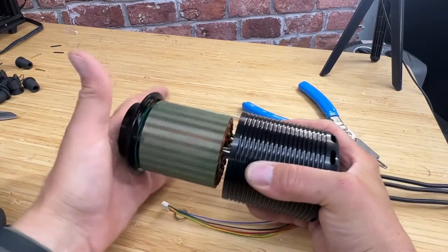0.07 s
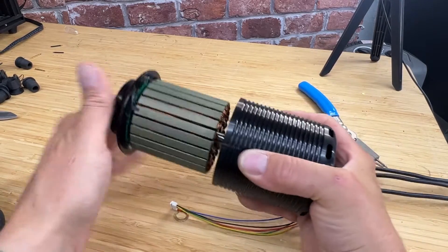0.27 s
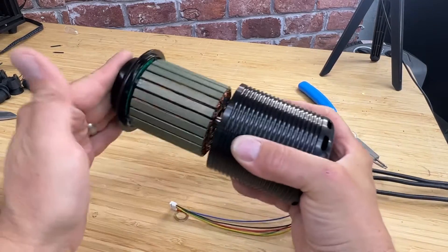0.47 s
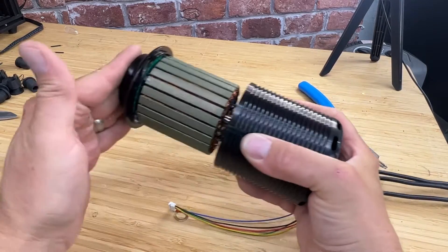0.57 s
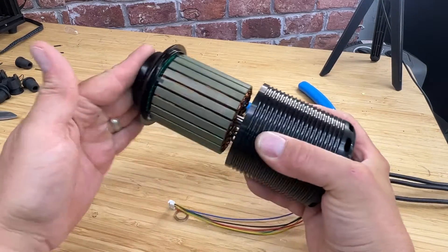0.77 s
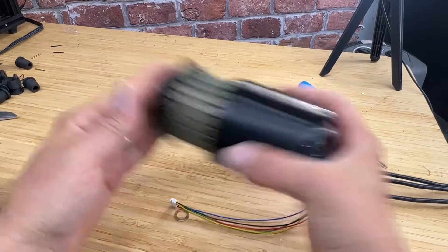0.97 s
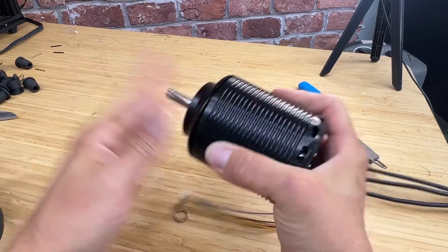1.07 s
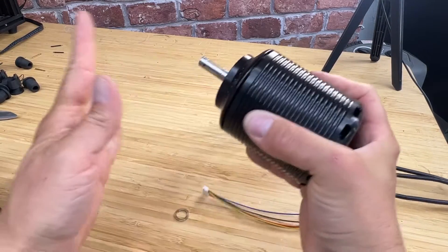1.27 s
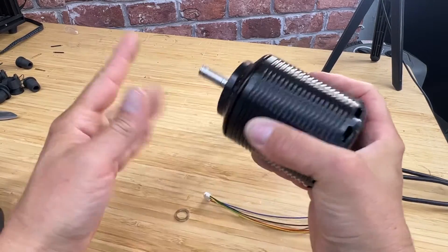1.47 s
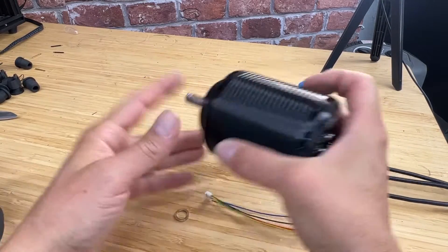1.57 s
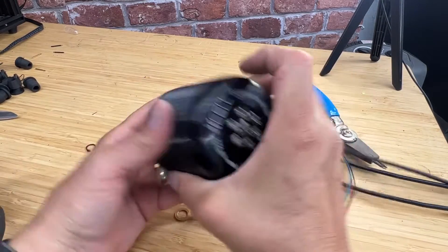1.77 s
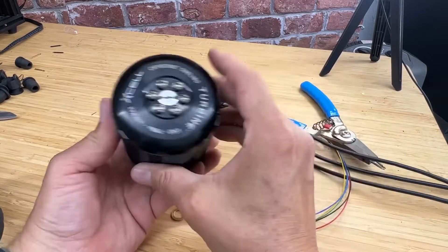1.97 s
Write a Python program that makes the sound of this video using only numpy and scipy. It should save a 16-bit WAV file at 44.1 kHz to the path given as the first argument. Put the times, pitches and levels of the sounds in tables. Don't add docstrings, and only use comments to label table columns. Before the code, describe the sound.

A motor core snaps into a metal housing with a violent, distorted clack and short high ring around one second; soft hand rustles and taps before and after, low distant hum, small room, close microphone.

```python
import sys
import numpy as np
from scipy import signal
from scipy.io import wavfile

SR = 44100
rng = np.random.default_rng(int(sys.argv[2]) if len(sys.argv) > 2 else 0)


def how_loud(loudness_db):
    steps = np.asarray(loudness_db, float) / 20
    return 10 ** steps


def bounce(signal):
    frames = np.transpose(np.atleast_2d(signal))
    limited = np.clip(frames, -1, 1)
    pcm = np.round(limited * 32767).astype(np.int16)
    wavfile.write(sys.argv[1], SR, pcm)


N = 88332

# frequency in Hz, level in dB.
AIR_SPECTRUM = [(12, -6), (40, -1.5), (110, -13.5), (170, -21.5), (400, -27.5), (1000, -51.5),
                (4000, -59.5), (16000, -76)]
AIR_DB = -43.5

# time in seconds, level in dB.
SHAFT_LEVEL = [(0.0, -31), (0.06, -34.5), (0.31, -39), (0.38, -35.5), (0.48, -39.5), (0.72, -35.5),
               (0.99, -31), (1.05, -29), (1.29, -34.5), (1.34, -34), (1.94, -38.5), (2.0, -43)]
# multiple of the shaft frequency, level in dB.
SHAFT_ORDERS = [(2, -39.5), (3, -46.5), (5, -57.5), (7, -62)]
SHAFT_HZ, SHAFT_WANDER_RAD = 29.28, 0.083
MAINS_HZ, MAINS_DB, WOBBLE_DB = 119.9, -43, 2

# time in seconds, level in dB.
HAND_LEVEL = [(0, -63), (.03, -59), (.25, -62), (.5, -65), (.66, -59), (.76, -53), (.85, -63.5), (1.3, -57),
              (1.45, -54), (1.62, -50), (1.8, -46), (1.92, -51), (2, -55.5)]
# frequency in Hz, level in dB per Hz.
RUSTLE_SPECTRUM = [(200, -2), (450, -4), (900, -7), (1700, -12), (3500, -22), (6000, -32), (10000, -44),
                   (15000, -59)]

# start in seconds, peak in dB, low edge in Hz, high edge in Hz,
# 60 dB decay time in seconds.
TAPS = [(.039, -55, 1200, 2470, .03), (0.064, -55.5, 1180, 2150, .03), (0.086, -60, 1190, 2630, .03),
        (.093, -65, 8000, 12000, .006), (0.12, -51, 2500, 9500, .006), (.148, -51, 1000, 2480, .06),
        (0.196, -51, 1010, 1680, .08), (0.404, -63, 3476, 4500, 0.009), (.599, -50, 700, 2600, .04),
        (0.689, -52, 990, 2360, 0.023), (0.704, -63, 1200, 4500, 0.0086), (0.728, -48.5, 1010, 3200, .04),
        (.7, -41.5, 330, 700, 0.62), (.765, -58.5, 1220, 3500, .03), (.906, -49, 491, 1400, 0.036),
        (1.4707, -34, 700, 3453, 0.0046), (1.472, -42, 356.6, 950, 0.062), (1.49, -47, 800, 1202, 0.44),
        (1.561, -47, 2720, 4950, .01), (1.801, -37.5, 455, 799, 0.055), (1.843, -30.5, 803, 1680, 0.032),
        (1.843, -31, 295, 600, 0.067), (1.848, -61.5, 10620, 11900, 0.0086), (1.862, -41, 500, 1894, 0.25)]

# frequency in Hz, 60 dB decay time in seconds.
ROOM_T60 = [(200, 0.9), (600, 0.5), (1300, 0.3719), (3700, 0.4221), (6000, 0.33), (9000, 0.34),
            (15000, 0.58)]
# frequency in Hz, level in dB.
ROOM_LEVEL = [(200, -56.5), (600, -47), (1300, -40), (3700, -41.5), (6000, -39), (9000, -59), (15000, -47)]
ROOM_ONSET_S = 0.0026
LATE_DB, LATE_STRETCH = -20, 1.88

SLIDE_START_S, SLIDE_END_S, SLIDE_DB, SLIDE_RISE_DB = 0.932, 1, -86, 15

BLOW_S = [
    .9815,
    1.0058,
    1.02134,
]
# housing ring in dB, core thud in dB, crack in dB.
BLOW_LEVELS = [
    (-29, -47, -24.5),
    (-0.5, 10.5, 3),
    (-3.5, 9.5, -6.5),
]
# frequency in Hz, level in dB, 60 dB decay time in seconds.
CORE_MODES = [(700, -28.5, 0.0045), (1089, -16, .01), (1266.2, -11, 0.028), (1451, -6, 0.0087),
              (1750, -18.5, 0.0086)]
HOUSING_HZ = [3705, 3760, 3722, 3600, 2487, 5490, 6250, 7440, 10100, 12770, 14870, 15065, 15250, 15600]
HOUSING_DB = [7, 4, -15, -26, -17.5, -27.5, -34.5, -34, -40.5, -37, -33.5, -23, -29, -27]
HOUSING_T60_S = [.05, .008, .11, .05, .04, .03, .015, .03, .09, .12, .1, .13, .07, .03]
LONG_RING_HZ, LONG_RING_DB, LONG_RING_T60_S = 3730, -36, 0.6
RING_LAG_S = 0.0008
TOUCH_ZING_DB = 22.5
CRACK_HZ, CRACK_T60_S = 7500, 0.029
CORE_CUT_HZ = 760

KNOCK_HZ, KNOCK_RISE_HZ_PER_S, KNOCK_DB, KNOCK_T60_S = 493, 5300, -30.5, 0.12

CLIP_TOP, CUTOFF_HZ, EDGE_S = 0.98, 16500, 0.004


def in_time(rows):
    return np.interp(np.arange(N) / SR, *np.transpose(rows))


def at_hz(points, hz):
    table = np.array(points)
    return np.interp(np.log(hz), np.log(table[:, 0]), table[:, 1])


def rms_one(x):
    return x / np.sqrt(np.mean(x ** 2) + 1e-20)


def drift(rate_hz):
    r = np.exp(-2 * np.pi * rate_hz / SR)
    slow = signal.lfilter([1], [1, -2 * r, r * r], rng.standard_normal(N + SR))
    return rms_one(slow[SR:])


def band_pass(x, low_hz, high_hz, order=2):
    return signal.sosfilt(signal.butter(order, [low_hz, high_hz], "band", fs=SR, output="sos"), x)


def bands(size):
    edges = 10 * 2 ** np.arange(0, 11, 0.5)
    white = rng.standard_normal((2, size + 8192))
    for k, (low, high) in enumerate(zip(edges, edges[1:])):
        yield np.sqrt(low * high), band_pass(white[k % 2], low, high)[8192:]


def ring(clicks, hz, t60):
    r = how_loud(-60 / (t60 * SR))
    w = 2 * np.pi * hz / SR
    return signal.lfilter([0, np.sin(w)], [1, -2 * r * np.cos(w), r * r], clicks + 1e-18)


def air():
    noise = sum(how_loud(at_hz(AIR_SPECTRUM, hz)) * band for hz, band in bands(N))
    return how_loud(AIR_DB) * rms_one(noise)


def machine():
    t = np.arange(N) / SR
    turn = 2 * np.pi * SHAFT_HZ * t + SHAFT_WANDER_RAD * drift(4.5)
    out = how_loud(in_time(SHAFT_LEVEL)) * np.sin(turn + 0.7)
    for multiple, db in SHAFT_ORDERS:
        phase = rng.uniform(0, 2 * np.pi)
        out += how_loud(db + WOBBLE_DB * drift(3.0)) * np.sin(multiple * turn + phase)
    out += how_loud(MAINS_DB + WOBBLE_DB * drift(2.5)) * np.sin(2 * np.pi * MAINS_HZ * t)
    return np.sqrt(2) * out


def rustle():
    noise = sum(how_loud(at_hz(RUSTLE_SPECTRUM, hz)) * band for hz, band in bands(N) if hz > 180)
    return how_loud(in_time(HAND_LEVEL) - 4.0) * rms_one(noise)


def taps():
    out, t = np.zeros(N), np.arange(6000) / SR
    for start_s, db, low_hz, high_hz, t60 in TAPS:
        puff = rng.standard_normal(6000) * how_loud(-60 * t / t60)
        shaped = band_pass(puff, low_hz, max(high_hz, 1.1 * low_hz), order=4)
        i = int(start_s * SR)
        out[i:i + 6000] += (how_loud(db) * shaped / np.abs(shaped).max())[:N - i]
    return out


def room(x):
    t = np.arange(SR) / SR
    tail = np.zeros(SR)
    for hz, band in bands(SR):
        if hz > 120:
            fall_db = -60 * t / at_hz(ROOM_T60, hz)
            decay = how_loud(1.1 * fall_db) + how_loud(LATE_DB + fall_db / LATE_STRETCH)
            tail += how_loud(at_hz(ROOM_LEVEL, hz)) * band * decay
    return signal.fftconvolve(x, tail * (1 - np.exp(-t / ROOM_ONSET_S)))[:N]


def slide():
    part = (np.arange(N) / SR - SLIDE_START_S) / (SLIDE_END_S - SLIDE_START_S)
    level = how_loud(SLIDE_DB + SLIDE_RISE_DB * np.clip(part, 0, 1))
    grit = rng.standard_normal(N) * (part > 0) * (part < 1) * level
    stirred = [(3720, -10), (7430, -18), (10100, -26.5), (15070, -10)]  # Hz, dB
    return 1.5 * np.diff(grit, prepend=0) + sum(how_loud(db) * ring(grit, hz, 0.026) for hz, db in stirred)


def blows():
    t = np.arange(N) / SR
    thud, wall, crack = np.zeros(N), np.zeros(N), np.zeros(N)
    for s, (ring_db, thud_db, crack_db) in zip(BLOW_S, BLOW_LEVELS):
        thud[int(s * SR)] = how_loud(thud_db)
        wall[int((s + RING_LAG_S) * SR)] = how_loud(ring_db)
        crack += (t >= s) * how_loud(crack_db - 60 * np.maximum(t - s, 0) / CRACK_T60_S)
    crack = band_pass(crack * rng.standard_normal(N), 2000, CRACK_HZ)
    touch = wall * (t < BLOW_S[1]) * how_loud(TOUCH_ZING_DB)
    housing = how_loud(LONG_RING_DB) * ring(wall, LONG_RING_HZ, LONG_RING_T60_S)
    for k, (hz, db, t60) in enumerate(zip(HOUSING_HZ, HOUSING_DB, HOUSING_T60_S)):
        sign = (-1) ** k
        housing += sign * how_loud(db) * ring(wall + touch * (hz > 9000), hz, t60)
    core = sum(how_loud(db) * ring(thud, hz, t60) for hz, db, t60 in CORE_MODES)
    core = signal.sosfilt(signal.butter(1, CORE_CUT_HZ, "high", fs=SR, output="sos"), core)
    return crack + housing - core


def trapped_air():
    t = np.clip(np.arange(N) / SR - BLOW_S[0], 0, BLOW_S[1] - BLOW_S[0])
    tone = np.sin(2 * np.pi * (KNOCK_HZ * t + KNOCK_RISE_HZ_PER_S * t * t / 2))
    return how_loud(KNOCK_DB - 60 * t / KNOCK_T60_S) * tone * (t < t.max())


def scene():
    near = blows() + trapped_air() + slide() + taps()
    return (near + room(near) + rustle() + machine() + air())[None]


def top_cut(x):
    return signal.sosfilt(signal.butter(12, 16620, fs=SR, output="sos"), x)


def record(dry):
    clipped = np.clip(dry, -CLIP_TOP, CLIP_TOP)
    x = signal.sosfilt(signal.cheby2(10, 40, CUTOFF_HZ, fs=SR, output="sos"), clipped)
    t = np.arange(N) / SR
    fade = np.clip(np.minimum(t / EDGE_S + 0.5, (t[-1] - t) / EDGE_S), 0, 1)
    return top_cut(x * fade)


dry = scene()
out = record(dry)
bounce(out)
```